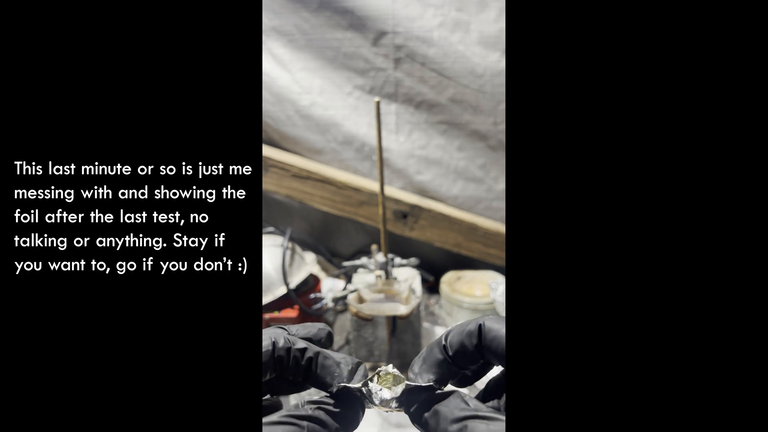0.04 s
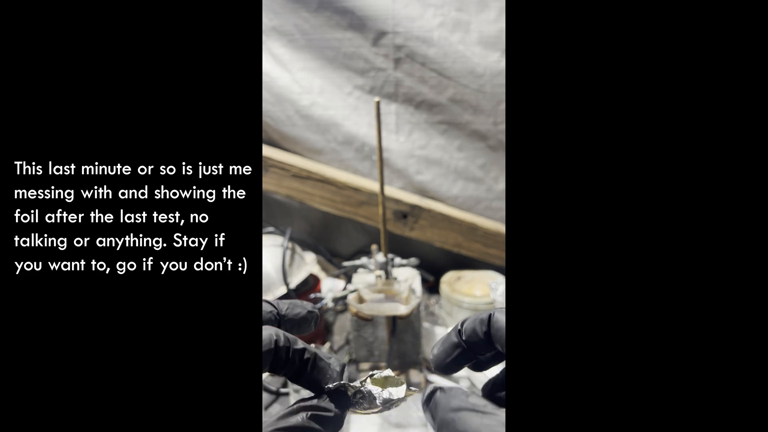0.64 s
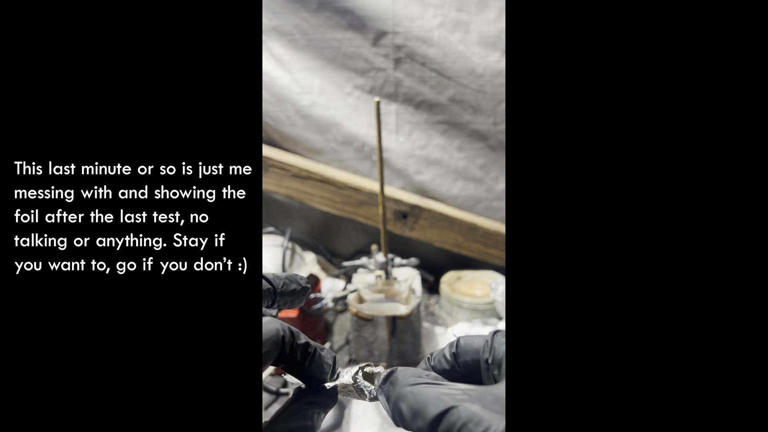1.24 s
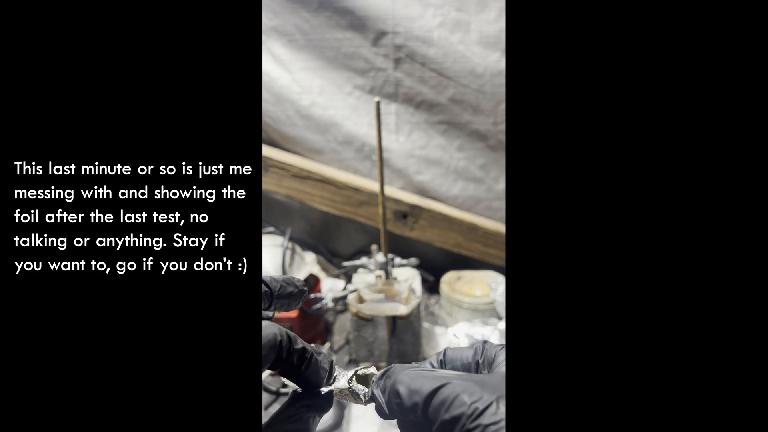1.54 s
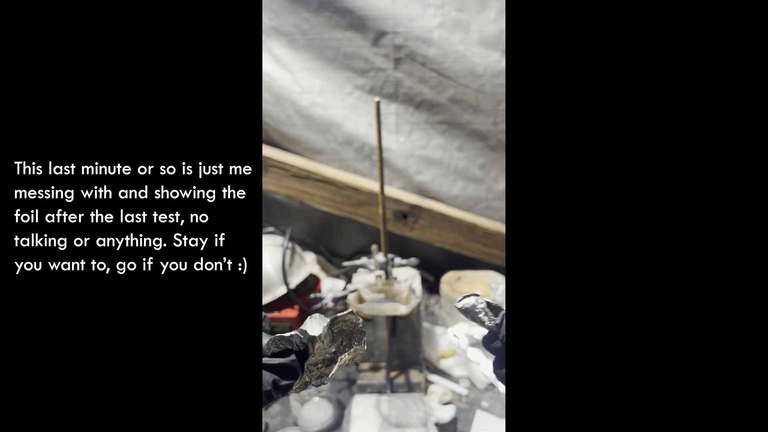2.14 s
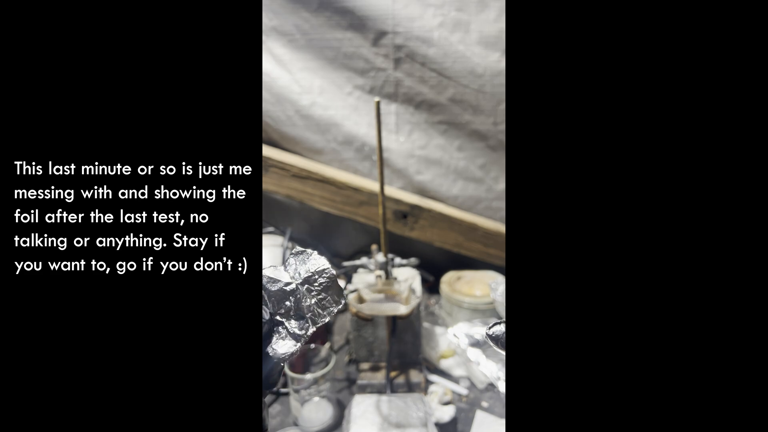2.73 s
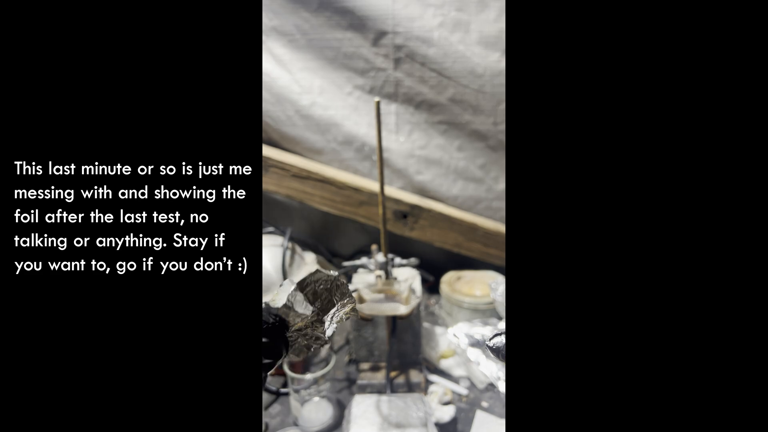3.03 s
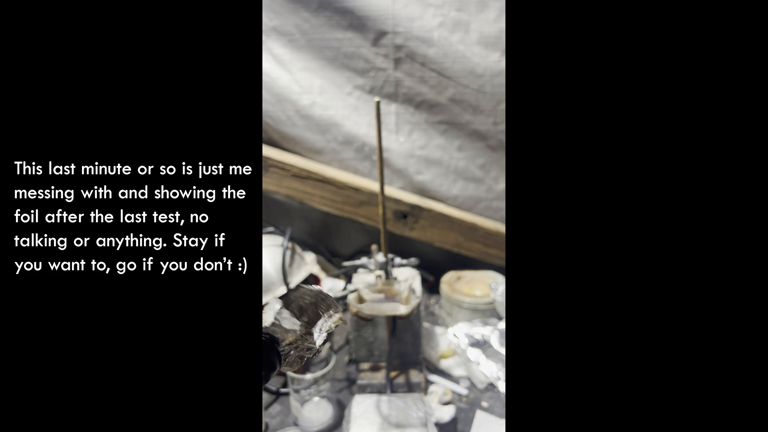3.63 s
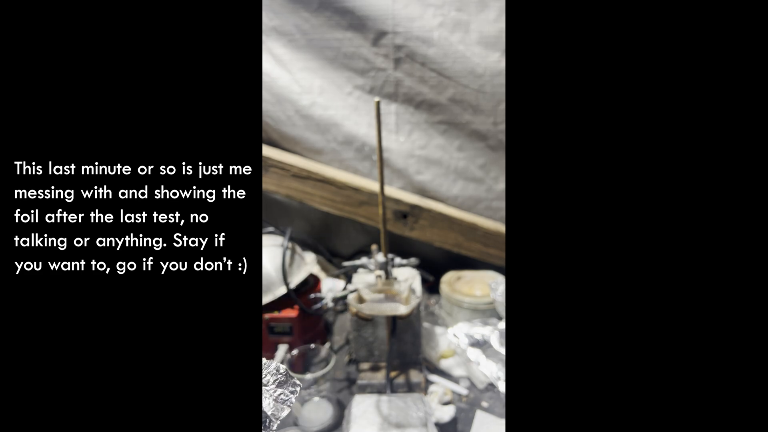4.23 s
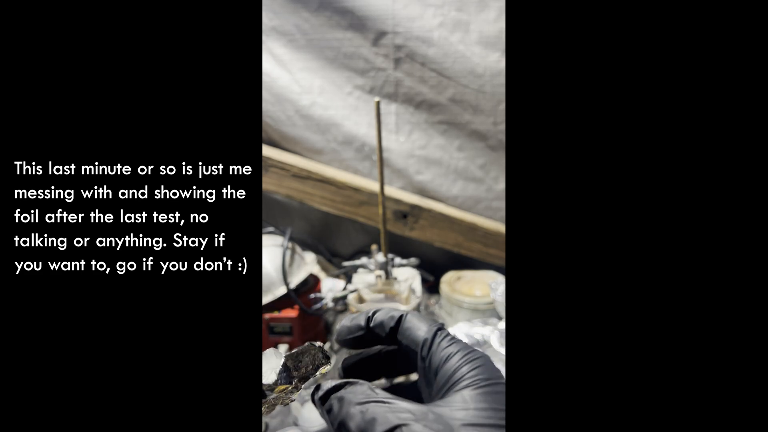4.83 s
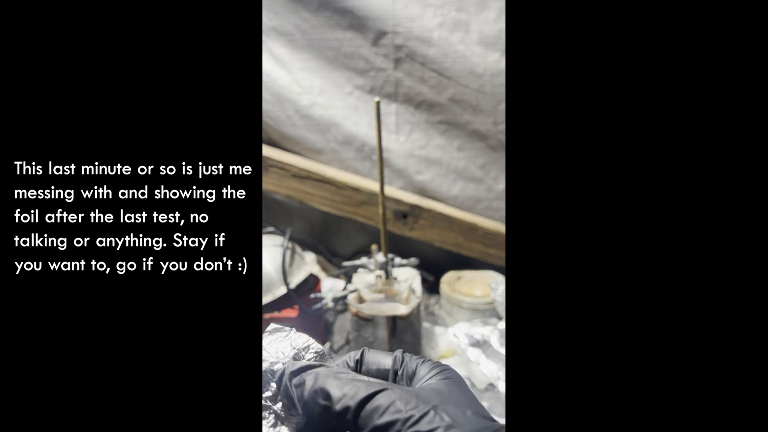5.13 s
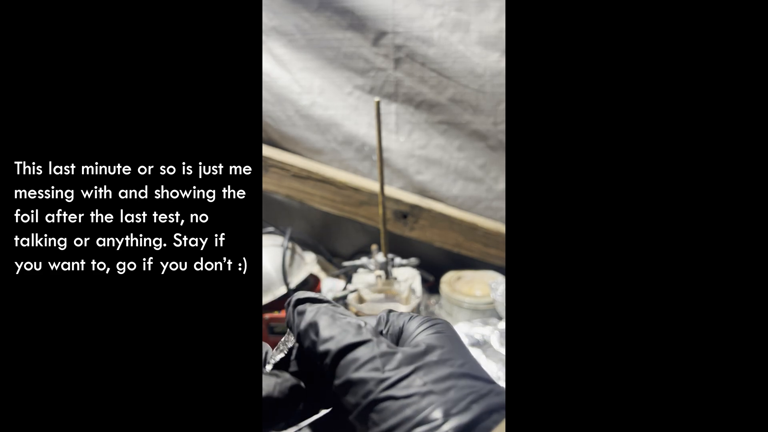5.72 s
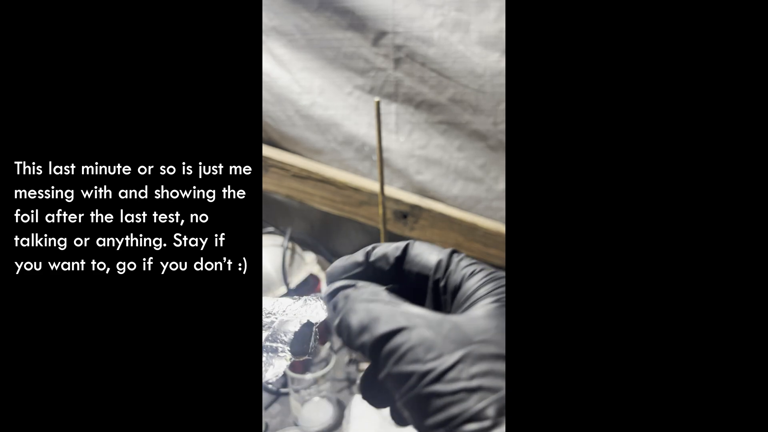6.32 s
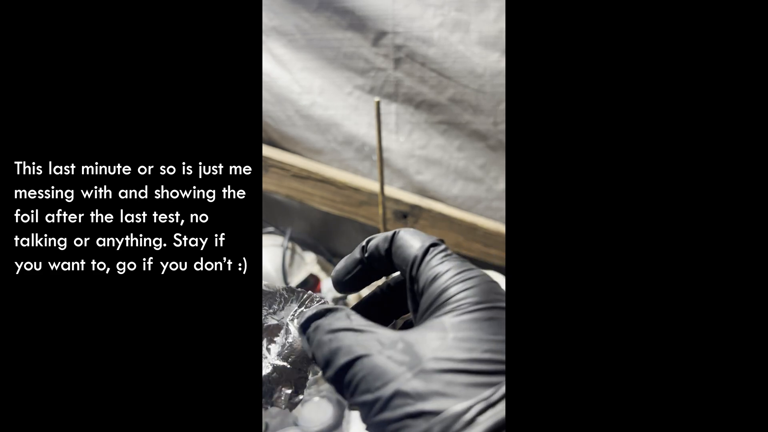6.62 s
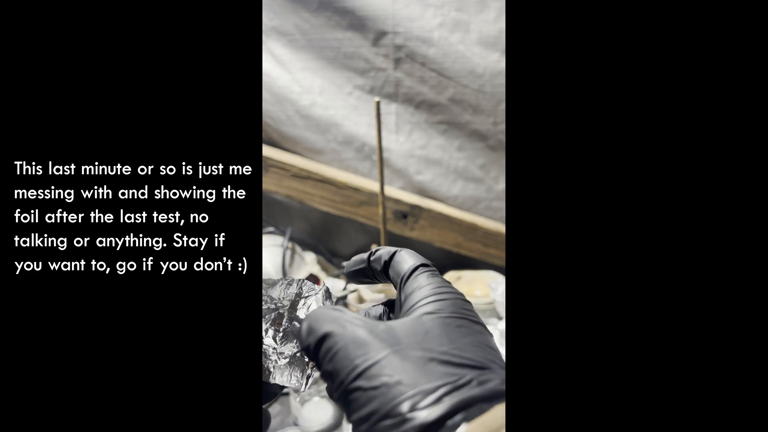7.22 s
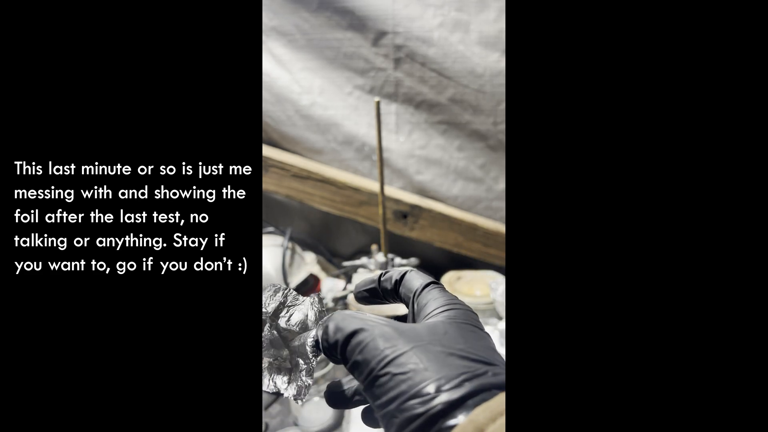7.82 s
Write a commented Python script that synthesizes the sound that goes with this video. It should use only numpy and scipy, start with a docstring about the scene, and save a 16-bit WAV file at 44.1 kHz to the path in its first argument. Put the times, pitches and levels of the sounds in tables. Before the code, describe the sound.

Crumpled aluminium foil crinkles and snaps in irregular bursts as gloved hands open and turn it, with soft rubbing between.

```python
"""A small workshop, a stereo microphone close to gloved hands that open and turn crumpled aluminium foil.
After half a second of silence the sound cuts in on a glove sliding, over a low rumble and a faint drone.
Creases give way in snaps and crackles that ring the sheet's facets, building to a sharp crack near 1.9 s.
Gloves and sleeves rub softly; just after 4 s come more snaps and a few light, ringing knocks.
More rubbing leads to the thickest run of snaps, around 7 s."""
import sys
import numpy as np
from scipy import signal
from scipy.fft import rfft, irfft
from scipy.io import wavfile

SR = 44100
rng = np.random.default_rng(int(sys.argv[2]) if len(sys.argv) > 2 else 0)


def master_out(mix):
    """Clip the mix to full scale and print it as 16-bit PCM to the path in sys.argv[1]."""
    frames = np.transpose(np.atleast_2d(mix))
    ceiling = np.clip(frames, -1, 1)
    pcm = np.round(ceiling * 32767).astype(np.int16)
    wavfile.write(sys.argv[1], SR, pcm)


N = 351036
TIME = np.arange(N) / SR

# creases giving way at the microphone: t/s, length/s, ring f/Hz, level/dB, body and sizzle/dB re level
CREASE_SNAPS = [(0.511, 0.009, 3520, -45.5, -17.5, -1.5), (0.957, 0.011, 3060, -42.5, -20.5, -3.5),
                (0.985, 0.0018, 2580, -41.5, -5.5, -3), (1.034, .015, 3420, -41, -29, -6.5),
                (1.565, 0.0034, 3930, -49, -7.5, -0.5), (1.639, .0015, 3160, -45.5, -17, -5),
                (1.658, 0.0031, 2970, -46, -11, -18), (1.679, 0.0075, 2930, -39, -11.5, -5),
                (1.7125, 0.0033, 3300, -41.5, -15, -12), (1.728, 0.015, 2920, -43.5, -15, -2),
                (1.855, 0.0037, 3440, -23, -28, -10), (1.863, 0.0057, 3500, -33.5, -16, -7.5),
                (2.512, 0.0027, 3150, -50.5, 0.5, -6), (2.664, 0.017, 2940, -62.5, -6, 2.5),
                (2.818, 0.0022, 3000, -70.5, -13, 0), (3.106, 0.0065, 3790, -46.5, -11.5, 1.5),
                (3.7312, 0.0028, 3120, -51.5, -6, -4), (3.861, 0.0018, 3050, -44.5, -11, -9),
                (3.897, 0.0029, 3100, -42, -8, -1), (3.902, 0.0019, 3000, -37, -4, -4),
                (3.908, 0.0031, 3140, -39, -3.5, -3.5), (3.977, 0.0027, 2880, -41.5, -8, -6),
                (4.002, 0.0058, 3530, -44, -10, -2), (4.036, 0.0032, 3870, -48.5, -16, -5),
                (4.1264, 0.0025, 4070, -25.5, -14, -3), (4.132, 0.0048, 4150, -36.5, -7.5, -4),
                (4.1477, 0.003, 3970, -34, -19, -8), (4.172, 0.0042, 4000, -41, -11, -4.5),
                (4.204, 0.0038, 3880, -45, -26, -19), (4.335, 0.006, 3070, -58, -26, 6.5),
                (4.999, 0.019, 2620, -44.5, -2.5, -1), (5.139, 0.0099, 3450, -47.5, -6, 4.5),
                (5.614, 0.0088, 2800, -42, -35, -12), (5.627, 0.015, 3620, -41.5, -17, -7),
                (5.948, 0.0011, 3460, -47, -8, 6), (6.102, 0.0049, 3300, -45.5, -4, 8),
                (6.11, 0.0032, 3180, -44.5, -6, 12), (6.122, 0.0097, 3300, -41, -4.5, 14),
                (6.184, 0.0015, 3250, -44, -6, -1), (6.868, 0.005, 3800, -45.5, -3.5, 6),
                (6.8936, 0.0022, 3080, -36.5, 0.5, -2), (6.9065, 0.0043, 3650, -34.5, -13, -4.5),
                (6.928, 0.0041, 3160, -40.5, -5, -1.5), (6.942, 0.0025, 3170, -44.5, -6, 0),
                (6.952, 0.0032, 3380, -54, -11, 5), (6.987, 0.0061, 3160, -41.5, -10, -0.5),
                (7.013, 0.0036, 3770, -47, 0.5, 4), (7.027, 0.0018, 3560, -41, -9, 6),
                (7.05, 0.0015, 3580, -20, -14, -0.5), (7.068, 0.012, 3440, -39.5, -15, -3),
                (7.0845, 0.0024, 3370, -35.5, -11.5, -0.5), (7.1666, 0.0013, 3580, -27.5, -16, 0.5),
                (7.1866, 0.0011, 3800, -24, -18.5, -1.5), (7.1953, 0.0009, 3800, -25, -21, -4.5),
                (7.221, 0.0021, 3500, -32.5, -7, 0.5), (7.284, 0.0027, 3400, -47, -20, -2),
                (7.2963, 0.0036, 2660, -30.5, -6.5, -2), (7.3755, 0.0024, 3360, -44.5, -14, -5),
                (7.393, 0.0018, 3160, -35.5, 0.5, 6), (7.401, 0.0035, 3000, -55, -5, 10),
                (7.424, 0.0045, 2500, -46, -10, 11), (7.431, 0.0072, 3300, -50.5, -3, 12.5),
                (7.444, 0.0045, 2180, -42.5, -14, 4), (7.451, 0.0022, 2450, -51, -11, 17.5),
                (7.5057, 0.0051, 3260, -35.5, -1.5, 4.5), (7.607, 0.003, 2730, -55, -7.5, 3)]
# resonances of the foil, from the whole sheet down to its smallest facets: f/Hz, width/Hz, level/dB
BODY_MODES = [(655, 510, -11), (1066, 570, -2), (1500, 640, -5)]
FACET_MODES = [(2316, 560, -13.5), (2913, 530, -4.5), (3610, 480, -4.5)]
SIZZLE_MODES = [(5290, 440, -17.5), (7040, 1830, -6.5), (8175, 1300, -4), (9990, 2160, -2.5),
                (12770, 3100, -6.5), (13300, 4400, -10)]
# facets that the small buckles ring: f/Hz, width/Hz, level/dB
CRINKLE_MODES = [(1600, 970, -16.5), (2873, 650, -4.5), (3240, 1240, -4), (6070, 1600, -18.5),
                 (7900, 830, -12.5), (10100, 2800, -14.5)]
# the sheet is bent until it yields: yield t/s, build-up/s, crackle level/dB
SHEET_BENDS = [(0.967, 0.053, -40), (1.04, 0.097, -46), (1.075, 0.025, -56), (1.192, 0.048, -63.5),
               (1.464, 0.043, -50), (1.517, 0.034, -49.5), (1.601, 0.046, -44.5), (1.689, 0.014, -43),
               (1.716, 0.036, -38), (1.746, 0.06, -39.5), (1.795, 0.098, -47), (1.851, 0.081, -38.5),
               (2.389, 0.023, -64), (2.548, 0.05, -48), (5.026, 0.049, -54.5), (5.52, 0.033, -56.5),
               (6.653, 0.063, -44), (7.22, 0.026, -46), (7.754, 0.1, -47)]
# a glove slides over the foil: t/s, length/s, attack/s, hiss level/dB, swell from start to end/dB,
# crackle/dB re hiss, rustle/dB re hiss
GLOVE_STROKES = [(0.51, 0.37, .03, -62.5, -0.5, -7.5, -6), (1.34, 0.14, 0.066, -68, 3, -0.5, -5.5),
                 (1.57, 0.34, .02, -68.5, 5, 10.5, 2), (1.94, 0.36, .07, -66, -2.5, -31, 0),
                 (2.039, 0.11, 0.077, -57.5, -2, -25, -8.5), (2.464, 0.12, 0.024, -60.5, 1, -23, -3),
                 (2.61, 0.13, 0.056, -69, -5.5, 2.5, -0.5), (2.945, 0.096, 0.051, -53.5, 0.5, -2, -8.5),
                 (3.07, 0.053, .04, -61.5, 2.5, -7.5, -1.5), (3.61, 0.11, 0.081, -60, 2.5, -1.5, -2),
                 (3.76, 0.15, 0.13, -68, 7, -22, 6), (3.92, 0.29, 0.08, -58.5, 0.5, -7, 3.5),
                 (4.22, 0.11, 0.059, -71, 3, 2, 6), (4.35, 0.077, 0.027, -58.5, 3, -3.5, -1.5),
                 (4.47, 0.14, 0.11, -66, -7.5, -2, 2), (4.62, 0.31, .07, -75, -3.5, -22, 5.5),
                 (4.875, 0.17, 0.051, -59.5, -0.5, -7, -3), (5.164, 0.1, 0.21, -63.5, -8.5, -1.5, 3),
                 (5.345, 0.19, 0.07, -52.5, -2.5, -6, -7.5), (5.616, 0.049, 0.051, -51.5, 1.5, -2, -9),
                 (5.799, 0.12, 0.13, -55, -1.5, -2.5, -10.5), (5.93, 0.13, 0.078, -60.5, 7, -5, -2.5),
                 (6.09, 0.06, 0.072, -45, 5, -7.5, -13.5), (6.2, 0.097, 0.13, -58.5, -7.5, 2, -1),
                 (6.441, 0.25, 0.091, -59, -4.5, -6, -4.5), (6.82, 0.038, 0.055, -49.5, 3, -9, -13.5),
                 (6.92, 0.13, 0.046, -61.5, 12.5, 2, 2.5), (7.19, 0.081, 0.087, -57, 4, 1, -1.5),
                 (7.35, 0.21, 0.11, -63.5, -4, -4, -3), (7.519, 0.019, .04, -64, -1, -1, 5.5),
                 (7.698, 0.03, 0.047, -48, 5, -2, -10), (7.842, 0.044, 0.016, -56, -0.5, 0, -11)]
# bright hiss and low rustle of the rubbing: f/Hz, relative density/dB
HISS_SPECTRUM = [(900, -13.5), (1500, -5), (2200, -6), (2900, -10), (3700, -4.5), (4900, -5.5),
                 (6000, -2.5), (8000, 2), (10000, -2.5), (12200, -1.5), (13300, -20), (15800, -38)]
RUSTLE_SPECTRUM = [(150, 4.5), (300, 3.5), (440, -1), (690, -6.5), (950, -3), (1400, -7), (2200, -8),
                   (3500, -9)]
# light knocks on something that rings: t/s, level/dB
LIGHT_KNOCKS = [(4.126, -39.5), (4.172, -45), (4.204, -57), (4.337, -53), (4.378, -58.5), (4.409, -57.5)]
# modes of the knocked object: f/Hz, level/dB re knock, t60/s
KNOCK_MODES = [(2290, -7, 0.16), (2910, -5.5, 0.13), (3980, 1, 0.05), (4240, 5.5, 0.035), (5200, 4, 0.022),
               (6800, -2, 0.051)]
# soft bumps of the hands: t/s, peak level/dB, f/Hz, t60/s
HAND_BUMPS = [(0.722, -44.5, 64.4, 0.08), (1.866, -42, 570, 0.031), (4.131, -42.5, 445, 0.081),
              (4.44, -49.5, 360, 0.11), (6.906, -47.5, 297, 0.045), (7.052, -36.5, 510, 0.033),
              (7.052, -40, 315, 0.033), (7.222, -50.5, 331, 0.14), (7.51, -64.5, 665, 0.66),
              (7.711, -45, 362, 0.044), (7.89, -60.5, 660, 0.26)]
# faint drone, far off: t/s, f/Hz, level/dB
FAR_DRONE = [(2.3, 164, -85), (2.6, 173.6, -69.5), (3.2, 180.8, -66), (3.7, 190.2, -66.5), (4.2, 197, -71),
             (4.5, 174, -66.5), (4.9, 168, -66), (5.4, 145, -70.5), (5.7, 136, -69), (7.9, 134, -70)]
# low rumble in the workshop: f/Hz, relative density/dB
RUMBLE_SPECTRUM = [(28, -28), (42, 0), (58, 4), (100, -3), (135, 0), (190, -6), (270, -13.5), (400, -18),
                   (600, -31), (1200, -34), (2500, -41), (8000, -45), (15000, -68)]
# phase by which the left microphone lags the right: f/Hz, lag/rad
LEFT_MIC_LAG = [(2000, 0), (3200, .3), (6800, .5), (9500, 1.3), (12600, 3.05), (14000, np.pi)]


def snaps(ring_width_hz=800, ring_db=-3, facet_db=-3, detune=0.053, uneven_db=1.3):
    """Foil, close and centred: each crease rings its own facet, and the rest of the sheet, retuned."""
    size = SR // 10
    lead = size // 4
    t = (np.arange(size) - lead) / SR
    out = np.zeros(N + size)
    for s, length_s, ring_hz, level_db, body_db, sizzle_db in CREASE_SNAPS:
        push = avalanche(length_s, t)
        snap = from_db(ring_db) * rms_one(resonate(push, ring_hz, ring_width_hz))
        groups = (BODY_MODES, body_db), (FACET_MODES, facet_db), (SIZZLE_MODES, sizzle_db)
        for modes, group_db in groups:
            gains = from_db([mode_db + uneven_db * rng.normal() for _, _, mode_db in modes])
            rings = [rms_one(resonate(push, detuned(hz, detune), width_hz)) for hz, width_hz, _ in modes]
            snap += from_db(group_db) * np.linalg.norm(gains) * rms_one(gains @ rings)
        snap *= from_db(level_db) * np.sqrt(length_s * SR / size)   # energy grows with the snap's length
        at = round(s * SR) - lead
        out[at:at + size] += snap
    return out[:N]


def avalanche(length_s, t, rise=0.68, fall=0.89, shiver_db=-24, shiver_s=0.017, crack=0.42):
    """A crease gives way: one main crack in a volley of buckles, then the sheet shivers on briefly."""
    from_top = t / length_s - .3
    volley = np.exp(-(from_top / np.where(from_top < 0, rise, fall)) ** 2)
    shiver = from_db(shiver_db) * np.exp(-np.abs(t) / shiver_s) * (t > 0)
    push = clicks(per_s=9000, spread_db=2.5, size=len(t)) * (volley + shiver)
    crack_share = crack / (1 + (length_s / 0.0065) ** 2)   # the crack counts most in short snaps
    push[np.searchsorted(t, length_s / 8)] += crack_share * np.linalg.norm(push)
    return push


def crinkle(strength, clump_db=2.5, flicker_db=2.24, left_bias_db=1.4):
    """Just left of centre, clumps of small buckles ring the facets and merge into a dry, broad rasp."""
    clumps = from_db(clump_db * drift(rate=220))
    rasp = 0
    for hz, width_hz, mode_db in CRINKLE_MODES:
        push = clicks(per_s=1400, spread_db=3.5) * clumps
        ring = resonate(push, hz, width_hz) * from_db(flicker_db * drift(rate=56))
        rasp += from_db(mode_db) * rms_one(ring)
    return rasp * strength * from_db([[left_bias_db / 2], [-left_bias_db / 2]])


def rubbing(hiss, rustle, flutter_db=1.5, lumpy_db=3, catch_db=-11):
    """Gloves slip on foil so densely that the grains merge into a swish; wrinkles catch and tick."""
    slips = rms_one(clicks(per_s=12000, spread_db=3.5))
    catches = from_db(catch_db) * rms_one(clicks(per_s=75, spread_db=4))
    swish = coloured(slips + catches, HISS_SPECTRUM) * from_db(flutter_db * drift(rate=79))
    low_rub = stereo_noise(RUSTLE_SPECTRUM, apart_hz=596) * from_db(lumpy_db * drift(rate=35))
    return swish * hiss + low_rub * rustle


def hands(bend_hiss_db=-11, bend_rustle_db=-25):
    """Strength of hiss, crackle and rustle over time: strokes mostly hiss, bends mostly crackle."""
    power = np.zeros((3, N))
    for s, length_s, attack_s, hiss_db, swell_db, crackle_db, rustle_db in GLOVE_STROKES:
        mix = from_db(hiss_db + np.array([0, crackle_db, rustle_db]))
        power += np.outer(mix, gesture(s, length_s, attack_s, release_s=0.054, swell_db=swell_db)) ** 2
    for s, build_s, crackle_db in SHEET_BENDS:
        mix = from_db(crackle_db + np.array([bend_hiss_db, 0, bend_rustle_db]))   # gloves slip a little
        power += np.outer(mix, gesture(s, 0, build_s, release_s=0.035)) ** 2
    return np.sqrt(power)


def gesture(start_s, length_s, attack_s, release_s, swell_db=0):
    """Gain of one hand movement: it builds, swells or eases, and fades; attack and release span 20 dB."""
    t = TIME - start_s
    outside = np.maximum(-t, 0) / attack_s + np.maximum(t - length_s, 0) / release_s
    progress = np.clip(t / max(length_s, 1 / SR), 0, 1)
    return from_db(swell_db * (progress - .5) - 20 * np.minimum(outside, 10) ** 0.95)


def knocks(detune=0.012, uneven_db=2, chatter_db=5):
    """Dull bumps of the hands, and light knocks whose modes vary in mix and tuning and chatter."""
    out = sum(struck(*bump) for bump in HAND_BUMPS)
    for hz, mode_db, t60 in KNOCK_MODES:
        rings = sum(struck(s, level_db + mode_db + uneven_db * rng.normal(), detuned(hz, detune), t60)
                    for s, level_db in LIGHT_KNOCKS)
        out += rings * from_db(chatter_db * drift(rate=260))
    return out


def bench_hollow(x, hz=560, width_hz=320, gain_db=-5):
    """The hollow between hands and bench rings low and reaches the two microphones in opposite phase."""
    return from_db(gain_db) * resonate(x.mean(axis=0), hz, width_hz) * np.array([[1], [-1]])


def workshop(x, gain_db=-6, t60=0.081, wall_hz=6000, first_s=0.00068, patterns=3):
    """Short reflections off the near bench and cloth walls; their pattern wanders as the hands move."""
    t = TIME[:SR // 4]
    tails = rng.standard_normal((patterns, 2, len(t))) * from_db(-60 * t / t60) * (t > first_s)
    tails /= np.linalg.norm(tails, axis=-1, keepdims=True)
    tails = signal.lfilter(*signal.butter(1, wall_hz, fs=SR), tails)
    shares = np.array([drift(rate=7) for _ in range(patterns)])
    shares /= np.linalg.norm(shares, axis=0)
    echoes = sum(signal.oaconvolve(x * share, tail, axes=1) for share, tail in zip(shares, tails))
    return from_db(gain_db) * echoes[:, :N]


def room_tone(waver_db=2.5, whine_db=-82, rumble_db=-60.5):
    """Behind the foil: a far drone that slowly changes pitch, a faint noisy whine and a low rumble."""
    hz, level_db = in_time(FAR_DRONE)
    phase = 2 * np.pi * np.cumsum(hz * (1 + .025 * drift(rate=30))) / SR
    drone = np.sqrt(2) * np.sin(phase) * from_db(level_db + waver_db * drift(rate=8.3))
    whine = from_db(whine_db) * rms_one(resonate(rng.standard_normal(N), hz=1800, width_hz=270))
    rumble = from_db(rumble_db) * stereo_noise(RUMBLE_SPECTRUM, apart_hz=680)
    return drone + whine + rumble


def clicks(per_s, spread_db, size=N):
    """Tiny impulses at random moments, most weak and a few strong."""
    strength = from_db(spread_db * np.minimum(rng.exponential(1, size), 4))
    return (rng.random(size) < per_s / SR) * strength * rng.choice([-1, 1], size)


def resonate(x, hz, width_hz):
    """A broad, quickly dying resonance."""
    edges = [hz - width_hz / 2, hz + width_hz / 2]
    return signal.sosfilt(signal.butter(2, edges, "band", fs=SR, output="sos"), x + 1e-18)


def struck(s, peak_db, hz, t60):
    """One mode, dying away from the moment s."""
    out, at = np.zeros(N), round(s * SR)
    t = TIME[:min(N - at, SR // 2)]
    out[at:at + len(t)] = from_db(peak_db - 60 * t / t60) * np.sin(2 * np.pi * hz * t)
    return out


def coloured(x, spectrum):
    """Shapes a steady sound to the spectrum, falling 12 dB an octave past its ends; rms 1."""
    hz, level_db = np.transpose(spectrum)
    bins = np.maximum(np.arange(N // 2 + 1) * SR / N, 1)
    gain = from_db(np.interp(np.log(bins), np.log(hz), level_db))
    skirts = np.minimum(1, bins / hz[0]) * np.minimum(1, hz[-1] / bins)
    return rms_one(irfft(rfft(x) * gain * skirts ** 2, N))


def stereo_noise(spectrum, apart_hz):
    """Coloured noise that both microphones share in the bass and less so from apart_hz upwards."""
    mid, side = coloured(rng.standard_normal((2, N)), spectrum)
    side = signal.lfilter(*signal.butter(1, apart_hz, "high", fs=SR), side)
    return rms_one(mid + side * [[1], [-1]])


def drift(rate):
    """A random wander of rms 1 that takes a new value `rate` times a second."""
    return rms_one(np.interp(TIME * rate, np.arange(4096), rng.standard_normal(4096)))


def in_time(rows):
    """Each column of a curve, at every sample."""
    s, *columns = np.transpose(rows)
    return [np.interp(TIME, s, column) for column in columns]


def detuned(hz, spread):
    return hz * np.exp(spread * rng.normal())


def from_db(db):
    return 10 ** (np.asarray(db) / 20)


def rms_one(x):
    return x / np.sqrt(np.mean(x ** 2) + 1e-20)


def scene():
    """Foil and hands up close, the bench and walls around them, room tone behind."""
    hiss, crackle, rustle = hands()
    handling = snaps() + crinkle(crackle) + knocks() + rubbing(hiss, rustle)
    return handling + bench_hollow(handling) + workshop(handling) + room_tone()


def record(dry, port_hz=4950, port_width_hz=550, start_s=0.51, cutoff_hz=15800):
    """The left microphone lags, most around its port's resonance; the sound cuts in; the top is cut."""
    lag = np.interp(np.arange(N // 2 + 1) * SR / N, *np.transpose(LEFT_MIC_LAG))
    left = irfft(rfft(dry[0]) * np.exp(-1j * lag), N)
    radius = np.exp(-np.pi * port_width_hz / SR)
    port = [1, -(1 + radius ** 2) * np.cos(2 * np.pi * port_hz / SR), radius ** 2]
    left = signal.lfilter(port[::-1], port, left)   # all-pass: only the phase turns
    pair = np.array([left, dry[1]]) * (TIME >= start_s)
    return signal.sosfilt(signal.ellip(10, .1, 80, cutoff_hz, fs=SR, output="sos"), pair)


dry = scene()
out = record(dry)
master_out(out)
```